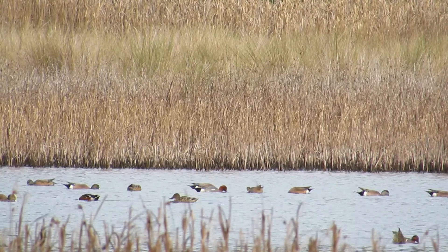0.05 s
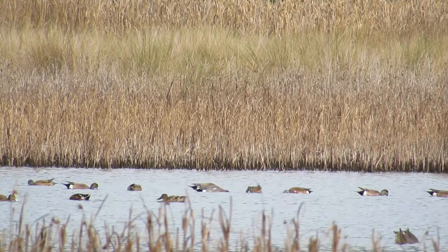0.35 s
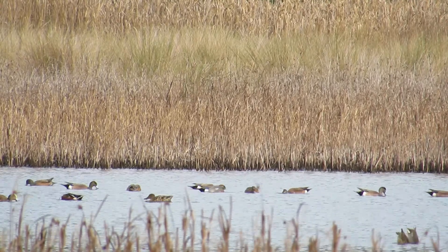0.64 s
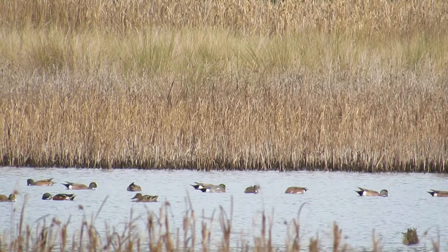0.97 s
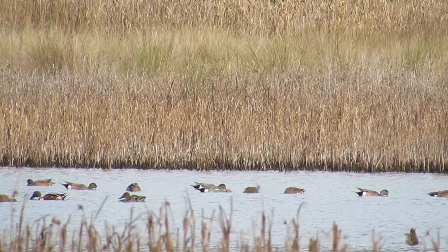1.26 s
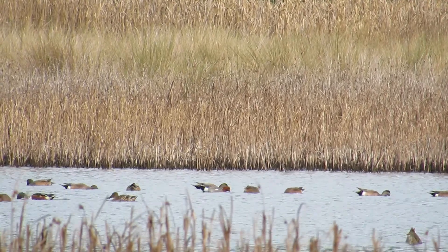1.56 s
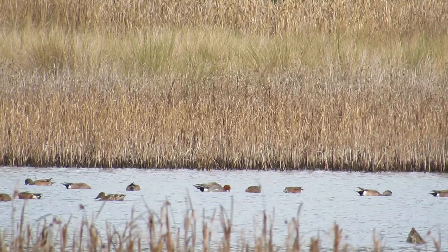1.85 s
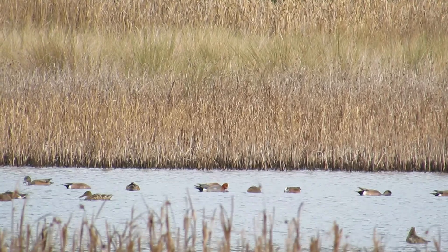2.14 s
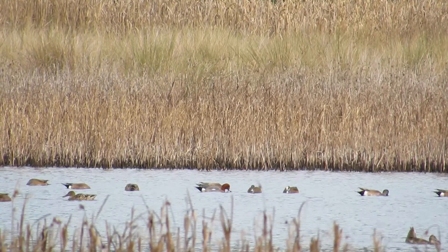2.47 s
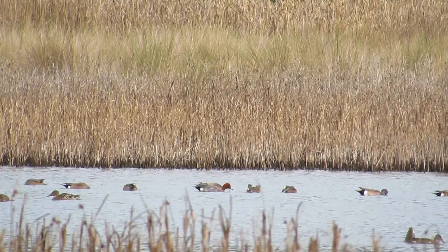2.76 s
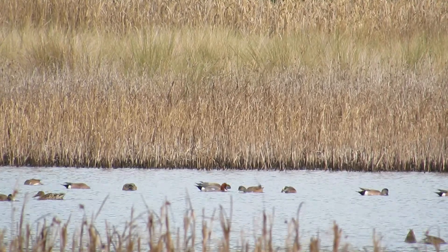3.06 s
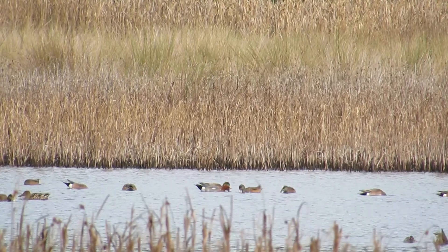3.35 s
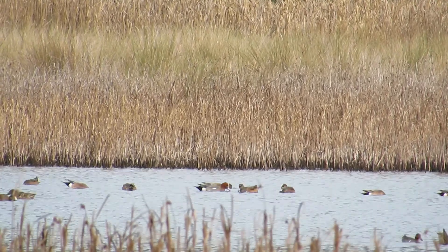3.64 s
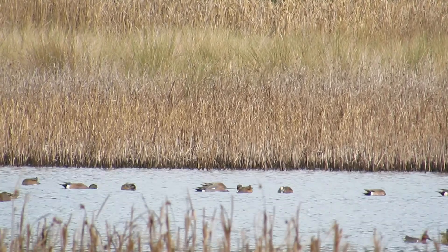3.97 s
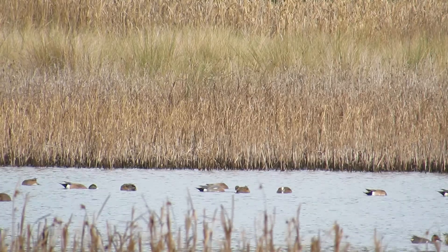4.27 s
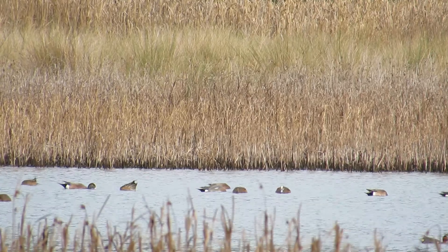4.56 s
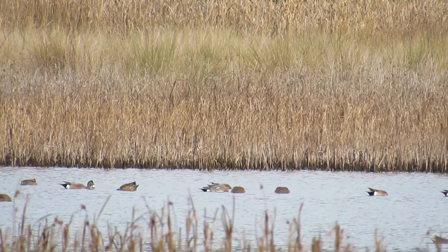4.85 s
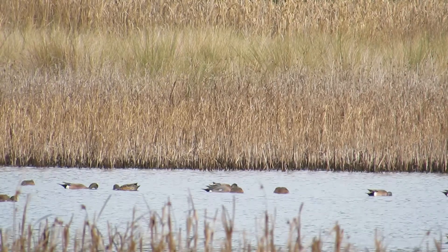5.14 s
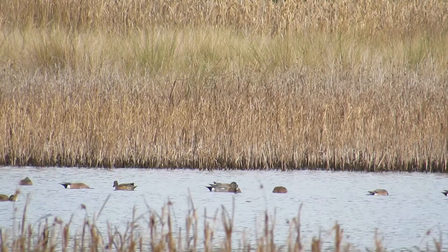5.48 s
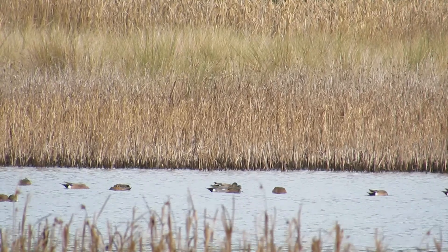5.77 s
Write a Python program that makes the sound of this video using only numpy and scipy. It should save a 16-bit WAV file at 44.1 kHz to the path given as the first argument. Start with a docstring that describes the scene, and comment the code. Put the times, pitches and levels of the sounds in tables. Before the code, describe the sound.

Quiet pond air with thin bird chirps and a far hum, then loud, low wind buffeting hits the microphone.

```python
"""A soft hiss and a far whine hang over a reedy pond, where small birds chip and whistle.
The hiss is broadband noise, the whine a narrow band of it; the calls are swept tones that the reeds
scatter, along with a few dry ticks. Halfway through, a gust reaches the microphone: its turbulence
rumbles on the capsules, and its hardest buffets overload the input and duck the limiter."""
import sys
import numpy as np
from scipy import signal
from scipy.fft import rfft, irfft, next_fast_len
from scipy.io import wavfile
from scipy.ndimage import uniform_filter1d

SR = 44100
rng = np.random.default_rng(int(sys.argv[2]) if len(sys.argv) > 2 else 0)


def generate_wav(sig):
    """Save sig (samples, or channels by samples) to the path in sys.argv[1] as 16-bit PCM at SR."""
    pcm = np.round(np.clip(np.atleast_2d(sig).T, -1, 1) * 32767).astype(np.int16)
    wavfile.write(sys.argv[1], SR, pcm)


N = 265041
TIME = np.arange(N) / SR

# Spectrum of the open-air hiss. Each row: frequency in Hz, relative density in dB.
AIR_SPECTRUM = [(15, -42), (25, 1), (64, 6.5), (93, 1), (148, -3), (188, -3.5), (537, -5.5), (848, -8),
                (1200, -15.5), (3340, -21.5), (3930, -26.5), (4740, -24), (10300, -32), (13200, -38),
                (15500, -53)]
# Swell of the hiss with the breeze. Each row: time in seconds, gain in dB.
BREEZE = [(0, 1.6), (0.4, 2.5), (1.0, 3), (1.2, 1.26), (3.0, 2.5), (4.8, -0.6), (6, 0.8)]
# Spectrum of the breeze in the reeds. Each row: frequency in Hz, relative density in dB.
RUSH_SPECTRUM = [(100, -56), (240, 13.5), (450, 3.5), (700, 0), (1400, -44)]
# The whine as the air carries it or lets it fade. Each row: time in seconds, level in dB.
WHINE_FADING = [(0.0, -51.5), (0.23, -44), (0.33, -52.5), (0.68, -48), (0.72, -60), (0.8, -44), (1.03, -51),
                (1.05, -59), (1.22, -45), (1.4, -53.5), (1.45, -43.5), (1.69, -52.5), (1.72, -39.5),
                (1.77, -53.5), (2.16, -48), (2.19, -55), (2.31, -49), (2.39, -65), (2.42, -53), (2.59, -59),
                (2.62, -44.5), (2.74, -57), (2.84, -48), (2.92, -55.5), (3.01, -43), (3.12, -55.5),
                (3.64, -48.5), (3.68, -69), (3.76, -48.5), (3.81, -58), (3.84, -58), (4.81, -51),
                (4.85, -71), (4.91, -53), (4.96, -60), (5.06, -42.5), (5.13, -59), (5.18, -41.5),
                (5.23, -55.5), (5.46, -47.5), (5.56, -59), (5.61, -43), (5.66, -59), (5.82, -76),
                (5.83, -57), (6.0, -48)]
# Drone around the whine. Each row: centre in Hz, nominal width in Hz, level in dB, left minus right in dB.
DRONE_BANDS = [(97.7, 2.9, -56, 4.5), (248.2, 28, -68, 13), (589.6, 20, -64, -1), (671.5, 24, -64.5, 16.5),
               (705, 75, -62, 16.5), (767, 35, -56, 2.5), (822, 23, -59, 5), (869, 58, -58, 9.5),
               (1051, 16, -69, 13), (1285, 54, -65.5, 10.5)]
# Dry ticks, a quick flutter and two strays. Each row: time in seconds, level before filtering in dB.
TICK_EVENTS = [(2.199, -45), (2.2132, -42), (2.2294, -48), (2.233, -50), (2.248, -45), (2.262, -48),
               (3.756, -47), (3.809, -44.5)]
# Filter that colours a tick. Each row: frequency in Hz, gain in dB.
TICK_FILTER = [(1500, -37), (2600, 0), (3300, 11), (4300, 6.5), (5100, 8.5), (7000, 1), (8100, 0),
               (8700, 7.5), (9700, -6), (12500, -4), (15500, -28)]
# A held note, then a falling one. Each row: start in seconds, length in seconds, fall in Hz,
# starting level in dB, crescendo in dB.
WHISTLE_NOTES = [(2.531, 0.148, 0, -59.5, 3), (2.735, .055, 1150, -60.5, 13)]
# Arched bird chips. Each row: time of the top in seconds, length in seconds, top pitch in Hz,
# fraction by which the ends lie lower, peak level in dB.
CHIP_ARCHES = [(0.258, 0.013, 5630, 0.46, -43), (0.403, 0.016, 5440, 0.49, -49),
               (0.919, 0.013, 3110, 0.3, -46), (0.929, 0.01, 2650, 0.32, -45),
               (0.936, 0.012, 5750, 0.42, -33.5), (0.943, 0.0068, 3600, 0.25, -49),
               (2.693, 0.016, 5930, 0.363, -40), (2.782, 0.027, 6780, 0.38, -42.5),
               (3.189, 0.015, 5400, 0.41, -43.5), (3.219, 0.031, 5950, 0.23, -37),
               (3.858, 0.02, 5700, .15, -54), (5.002, .036, 5640, .1, -56.5),
               (5.024, 0.0089, 3090, 0.27, -49), (5.03, 0.0097, 2710, 0.6, -47),
               (5.692, 0.012, 5800, 0.21, -43), (6.0, 0.09, 7250, .1, -62)]
# Wind at the microphone: a faint puff, a calm, then the gust. Each row: time in seconds, level in dB.
GUST_LEVEL = [(0, -61), (0.22, -64), (0.42, -42), (0.75, -59), (2.6, -54), (2.67, -29), (2.8, -19),
              (3.15, -20.5), (3.35, -12.5), (3.48, -19.5), (3.9, -16), (4.08, -23.5), (4.38, -19),
              (4.55, -21.5), (4.92, -25.5), (5.14, -21.5), (5.22, -23.5), (5.33, -24), (5.42, -36.5),
              (5.55, -30), (5.66, -16), (5.73, -25.5), (6, -29)]
# Spectrum of the turbulence. Each row: frequency in Hz, relative density in dB.
RUMBLE_SPECTRUM = [(8.8, -29), (15, -15.5), (59, 6.5), (86, 2), (148, -9.5), (219, -20), (426, -46.5),
                   (560, -64), (730, -64), (1230, -120)]
# How churned up the gust is. Each row: time in seconds, gain of the small eddies in dB.
GUST_CHURN = [(0, -7), (2.7, 4), (2.95, -4), (3.06, 1), (4.0, -1.5), (4.3, -4), (6, 7.5)]
# Single eddies hitting the microphone. Each row: time in seconds, level in dB,
# fastest swing in Hz, half length in seconds.
BUFFET_EVENTS = [(2.792, -8, 78, 0.0078), (2.823, -0.5, 86, 0.0099), (2.847, -4.5, 110, 0.0053),
                 (2.931, -8, 74.5, 0.019), (3.047, -4.5, 148, 0.0049), (3.076, -5, 102, 0.0065),
                 (3.128, -5.5, 76, 0.0074), (3.174, -5.5, 92, 0.0067), (3.274, -9, 95, 0.0025),
                 (3.293, 4, 100, 0.006), (3.310, 2, 155, 0.0048), (3.352, 0, 92, 0.01),
                 (3.527, -6, 123, 0.0043), (3.553, -9, 100, 0.0055), (3.613, -7.5, 141, 0.011),
                 (3.739, -15, 65, 0.0069), (3.789, -6, 91, 0.0032), (3.829, 3, 140, 0.0067),
                 (3.882, -10, 182, 0.006), (3.9, -6, 125, 0.0078), (4.162, -11.5, 90, 0.005),
                 (4.211, -9.5, 96, 0.003), (4.263, -8.5, 109, 0.007), (4.323, -9.5, 212, 0.0033),
                 (4.371, -16, 167, 0.0027), (4.472, -6, 106, 0.0072), (4.608, 1, 75, 0.011),
                 (4.659, -5.5, 125, 0.0044), (4.68, -0.5, 156, 0.0031), (4.827, -0.5, 96.5, 0.0078),
                 (5.008, -1, 153, 0.004), (5.095, 5, 139, 0.007), (5.173, -8, 138, 0.0062),
                 (5.202, -2.5, 103, 0.005), (5.234, -5.5, 130, 0.004), (5.252, -6, 120, 0.01),
                 (5.27, -2.5, 130, 0.0038), (5.352, -5.5, 96, 0.0029), (5.637, -2.5, 87, 0.0093),
                 (5.661, 8, 122, 0.008)]
# Spectrum of the small eddies shed by a buffet. Each row: frequency in Hz, relative density in dB.
SHED_SPECTRUM = [(90, 9), (160, 14), (240, 0), (330, -8.5), (480, -31), (1500, -48)]
# Narrow cuts after the limiter. Each row: centre in Hz, width in Hz.
NOTCH_BANDS = [(3945, 190), (7880, 140)]


def from_db(db):
    """Amplitude grows tenfold with every 20 dB."""
    return 10 ** (np.asarray(db) / 20)


def unit_rms(x):
    """Normalisation to a mean power of 1."""
    return x / np.sqrt(np.mean(x ** 2) + 1e-20)


def envelope(rows):
    """Linear interpolation of (seconds, value) rows at every sample."""
    return np.interp(TIME, *np.transpose(rows))


def colour(x, points):
    """Filtering as multiplication of the spectrum by a (Hz, dB) curve."""
    hz, db = np.transpose(points)
    bins = np.linspace(0, SR / 2, N + 1)
    gain = from_db(np.interp(np.log(bins + 1), np.log(hz), db))
    return irfft(rfft(x, 2 * N) * gain)[..., :N]


def drift(rate_hz):
    """Low-pass filtered noise: a random wander of rms 1, computed at every 40th sample."""
    pole = np.exp(-80 * np.pi * rate_hz / SR)
    slow = signal.lfilter([1], [1, -2 * pole, pole * pole], rng.standard_normal(N // 40 + 2002))[2000:]
    return np.interp(np.arange(N) / 40, np.arange(len(slow)), unit_rms(slow))


def narrowband(hz, waver_hz):
    """Random modulation of amplitude and phase spreads a complex tone into a narrow band."""
    return (drift(waver_hz) + 1j * drift(waver_hz)) * np.exp(2j * np.pi * hz * TIME)


def pan(db):
    """A level difference, left minus right, gives a source its direction."""
    return from_db(np.array([[db], [-db]]) / 2)


def off_axis(x, lag_s=0.00003):
    """Path difference: sound from the left reaches the right capsule later."""
    hz = np.arange(N // 2 + 1) * SR / N
    return np.array([x, irfft(rfft(x) * np.exp(-2j * np.pi * hz * lag_s), N)])


def capsules(side, mid_db, mid):
    """Air pushing on the capsules drives the channels in antiphase; a second part is common to both."""
    return side * np.array([[1], [-1]]) + from_db(mid_db) * mid


def reed_scatter(x, t60, wet_db, build_s=0.0013, smear_rad=3.4, smear_hz=70):
    """Scattering in the reeds gives each side a diffuse tail; moving air modulates its phase."""
    t = TIME[:SR // 2]
    tail = rng.standard_normal((2, len(t))) * from_db(-60 * t / t60) * (1 - np.exp(-t / build_s))
    tail /= np.sqrt(np.sum(tail ** 2, axis=1, keepdims=True))
    scattered = signal.fftconvolve(np.atleast_2d(x), tail, axes=1)
    analytic = signal.hilbert(scattered, next_fast_len(N + len(t)))[:, :N]
    return x + from_db(wet_db) * (analytic * np.exp(1j * smear_rad * drift(smear_hz))).real


def air_hiss(level_db=-45):
    """Broadband noise swells with the breeze, uncorrelated in the treble and opposed in the bass."""
    side, mid = unit_rms(colour(rng.standard_normal((2, N)), AIR_SPECTRUM))
    mid = colour(mid, [(60, -7.5), (380, -8.5), (650, -8.0), (1000, 1.5), (2000, 0.0)])
    return capsules(side, 0, mid) * from_db(level_db + envelope(BREEZE))


def reed_rush(base_db=-69, exponent=5.75):
    """Flow noise in the reeds grows as a power of the hiss, so it is heard only as the breeze freshens."""
    rush = unit_rms(colour(rng.standard_normal((2, N)), RUSH_SPECTRUM))
    return rush * from_db(base_db + exponent * envelope(BREEZE))


def far_whine(hz=849, waver_hz=8, steadiness=0.65, flicker_db=2.1, flicker_hz=18):
    """Propagation through moving air smears and fades a machine-like tone among weaker bands of drone."""
    band = narrowband(hz, waver_hz)
    tone = unit_rms((band / (np.abs(band) + 0.19) ** steadiness).real)   # evens out the amplitude
    level_db = envelope(WHINE_FADING) + flicker_db * np.tanh(drift(flicker_hz))
    out = tone * from_db(level_db) * pan(7.1)
    for centre_hz, width_hz, db, pan_db in DRONE_BANDS:
        out += narrowband(centre_hz, width_hz * 0.57).real * from_db(db) * pan(pan_db)
    return out


def ticks(decay_s=0.0011):
    """Brief snaps in the reeds have broad spectra: noise bursts that rise and fall exponentially."""
    bursts = sum(from_db(db) * np.exp(-np.abs(TIME - s) / decay_s) for s, db in TICK_EVENTS)
    return reed_scatter(colour(bursts * rng.standard_normal(N), TICK_FILTER), t60=0.13, wet_db=3.5)


def bird_whistle(start_hz=7645, waver_hz=60, flicker_db=3, bend=0.87, edge_s=0.015):
    """A thin note is a sine modulated in frequency and amplitude: it wavers and swells, held or falling."""
    out = np.zeros(N)
    waver, flicker = waver_hz * drift(120), flicker_db * drift(50)
    for start, length, fall_hz, db, crescendo_db in WHISTLE_NOTES:
        on = (TIME > start) & (TIME < start + length)
        u = (TIME[on] - start) / length
        edges = np.minimum(np.minimum(u, 1 - u) * length / edge_s, 1)
        pitch = start_hz - fall_hz * u ** bend + waver[on]
        amplitude = edges * from_db(db + crescendo_db * u + flicker[on])
        out[on] += amplitude * np.sin(2 * np.pi * np.cumsum(pitch) / SR)
    return reed_scatter(out, t60=0.43, wet_db=7.0, smear_rad=0.6)


def bird_chips(arch_power=2.18, taper=0.76, rasp=0.17):
    """A chip is a frequency sweep up and down, loudest at its top; jitter in pitch makes it raspy."""
    out, jitter = np.zeros(N), drift(900)
    for s, length, top_hz, sweep, db in CHIP_ARCHES:
        u = (TIME - s) / (length / 2)
        on = np.abs(u) < 1
        pitch = top_hz * (1 - sweep * (np.abs(u[on]) ** arch_power + rasp * jitter[on]))
        amplitude = from_db(db) * np.cos(u[on] * np.pi / 2) ** taper
        out[on] += amplitude * np.sin(2 * np.pi * np.cumsum(pitch) / SR)
    return reed_scatter(off_axis(out), t60=0.32, wet_db=-4.5)


def wind_rumble(lumpy_db=4.5, split_hz=160, flutter_db=9, flutter_hz=16, large_db=-2.5, even_s=0.0475):
    """Turbulent pressure follows the gust; large eddies give the bass, small fast ones come in bursts."""
    turbulence = unit_rms(colour(rng.standard_normal((2, N)), RUMBLE_SPECTRUM))
    turbulence /= np.sqrt(uniform_filter1d(turbulence ** 2, int(even_s * SR), axis=1))
    large = signal.sosfiltfilt(signal.butter(2, split_hz, fs=SR, output="sos"), turbulence)
    churn_db = envelope(GUST_CHURN) + flutter_db * np.tanh(drift(flutter_hz))
    small = (turbulence - large) * from_db(churn_db)
    rumble = from_db(large_db) * capsules(large[0], -11.5, large[1]) + capsules(small[0], -15, small[1])
    gust_db = envelope(GUST_LEVEL) + lumpy_db * np.tanh(drift(12.1))
    return rumble * pan(-0.22) * from_db(gust_db)


def wind_buffets(shed_db=-20, brisk_hz=140, crossing_s=0.00017, steepening=0.1, lean_db=-2):
    """A passing eddy swings the pressure fastest at its centre; brisker ones shed more small eddies."""
    out = np.zeros((2, N))
    side, mid = unit_rms(colour(rng.standard_normal((2, N)), SHED_SPECTRUM))
    small_eddies = from_db(shed_db) * capsules(side, -10.5, mid)
    lag_s = crossing_s * np.array([[1], [0]])   # the wind comes from the right
    skews = rng.uniform(-0.52, 0.28, len(BUFFET_EVENTS))
    for (s, db, hz, half_s), skew in zip(BUFFET_EVENTS, skews):
        u = (TIME - s - lag_s) / half_s
        away = np.where(u < 0, u * (1 + steepening * from_db(db) ** 2), u)   # harder: a steeper front
        phase = 2 * np.pi * hz * half_s * np.arcsinh(u) + skew
        swing = np.cos(phase) / (1 + away ** 2) * np.exp(-(away / 3.5) ** 2)
        shed = small_eddies * hz / brisk_hz * np.exp(-(away / 2.35) ** 2)
        out += from_db(db) * (swing * np.array([[1], [-1]]) + shed)
    return out * pan(lean_db) / pan(lean_db).max()


def scene():
    """Superposition: the pressures of all sources add at the microphone."""
    pond = air_hiss() + reed_rush() + far_whine() + bird_chips() + bird_whistle() + ticks()
    return pond + wind_rumble() + wind_buffets()


def record(dry, attack_s=0.00003, release_db_per_s=15, notch_depth=0.9, cutoff_hz=15100):
    """Peak limiting ducks both channels on overload and recovers slowly; notches and a low-pass follow."""
    peak_db = 20 * np.log10(np.max(np.abs(dry), axis=0) + 1e-9)
    over_db = np.maximum(peak_db, 0)
    held_db = np.maximum.accumulate(over_db + release_db_per_s * TIME) - release_db_per_s * TIME
    pole = np.exp(-1 / (attack_s * SR))
    duck_db = signal.lfilter([1 - pole], [1, -pole], held_db)
    out = np.clip(dry * from_db(-duck_db), -1, 1)
    for hz, width_hz in NOTCH_BANDS:
        out = out - notch_depth * signal.lfilter(*signal.iirpeak(hz, hz / width_hz, fs=SR), out)
    return signal.sosfilt(signal.ellip(8, 0.1, 80, cutoff_hz, fs=SR, output="sos"), out)


dry = scene()
out = record(dry)
generate_wav(out)
```